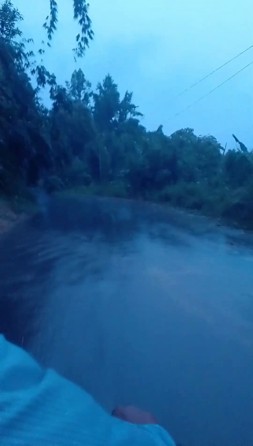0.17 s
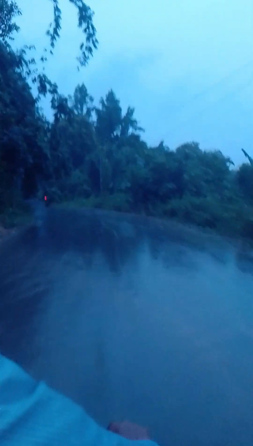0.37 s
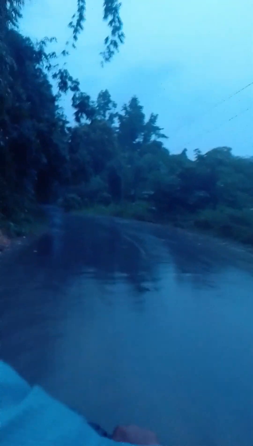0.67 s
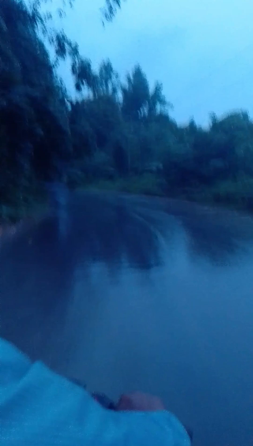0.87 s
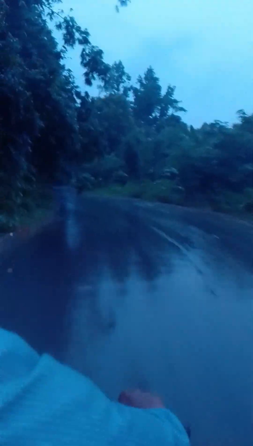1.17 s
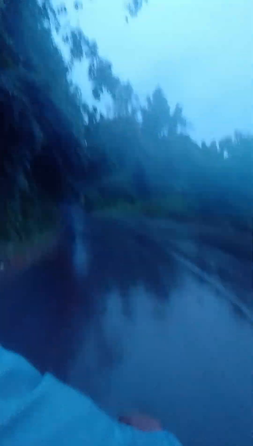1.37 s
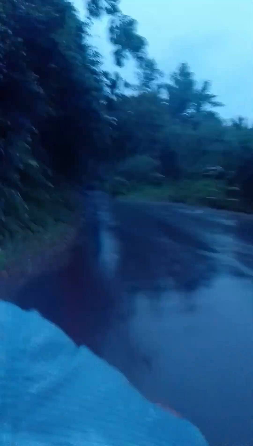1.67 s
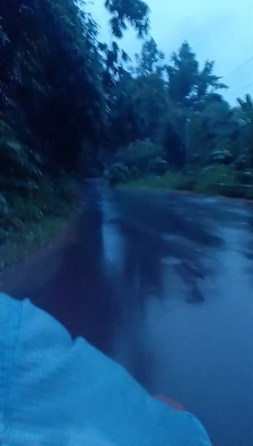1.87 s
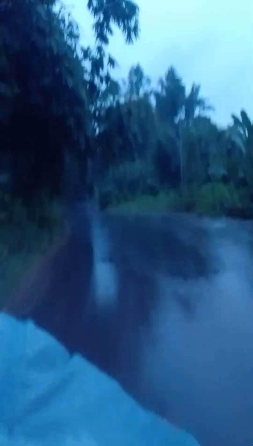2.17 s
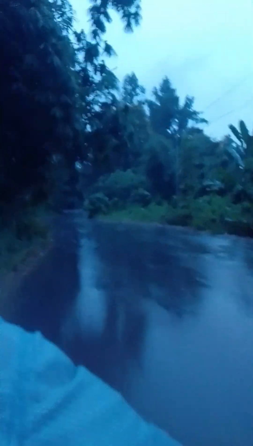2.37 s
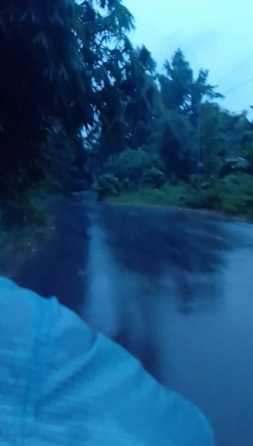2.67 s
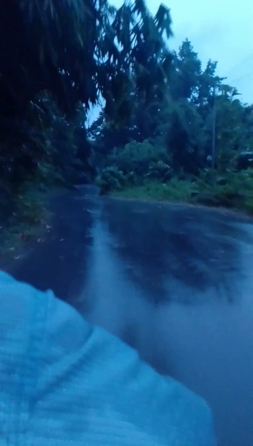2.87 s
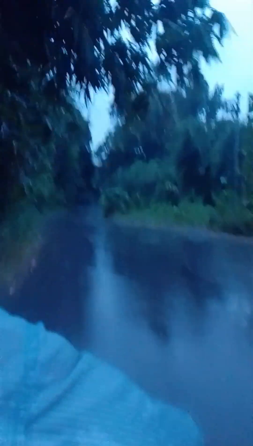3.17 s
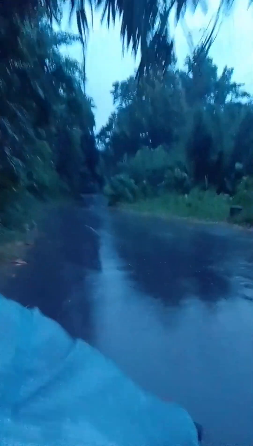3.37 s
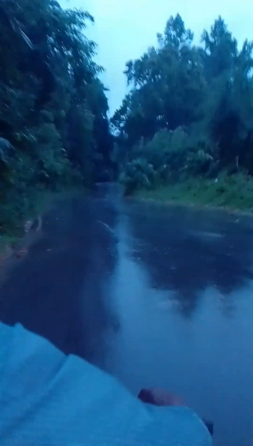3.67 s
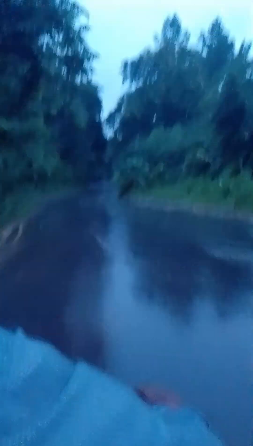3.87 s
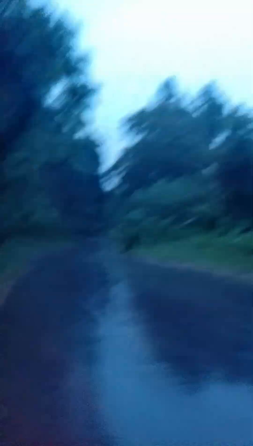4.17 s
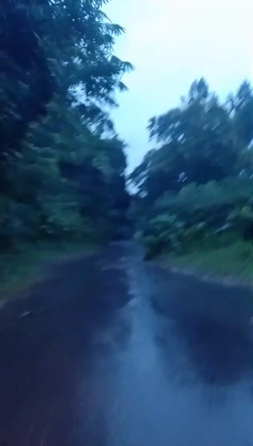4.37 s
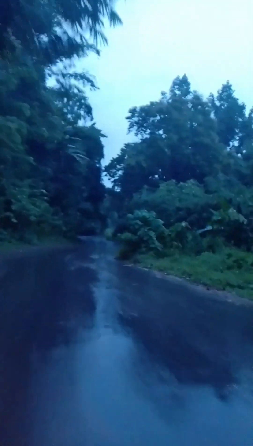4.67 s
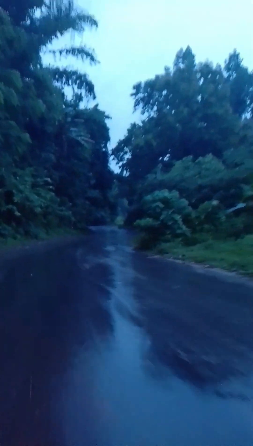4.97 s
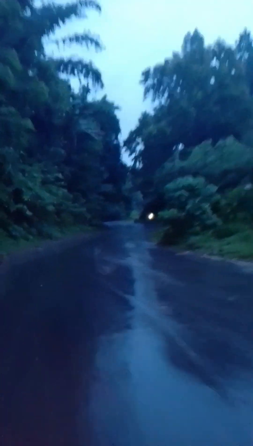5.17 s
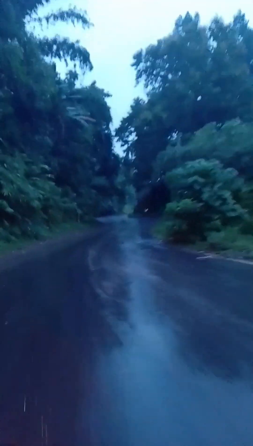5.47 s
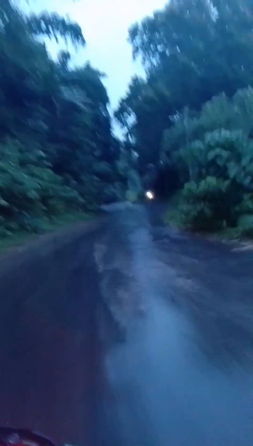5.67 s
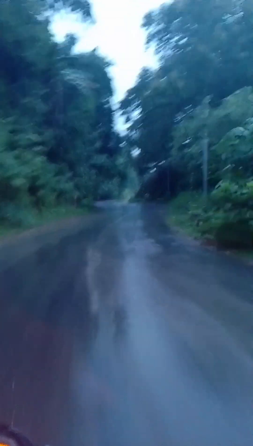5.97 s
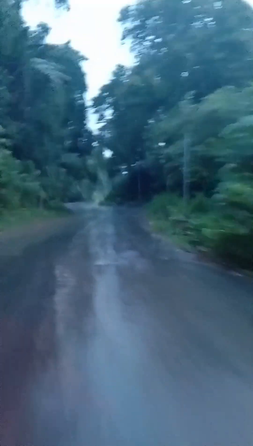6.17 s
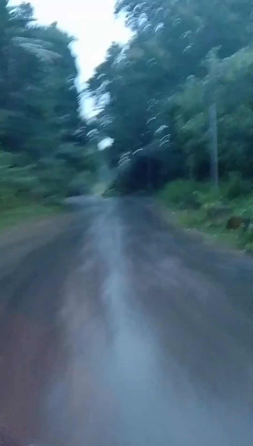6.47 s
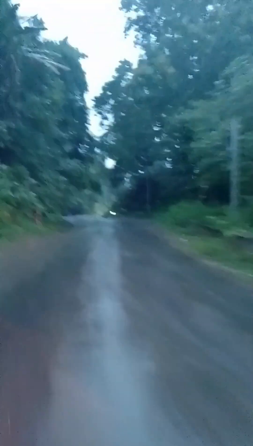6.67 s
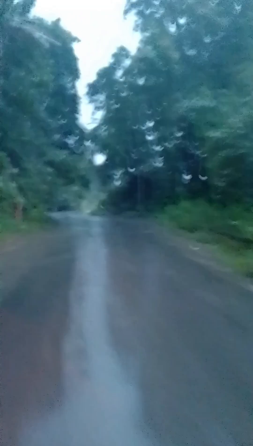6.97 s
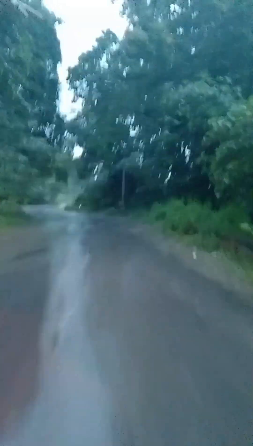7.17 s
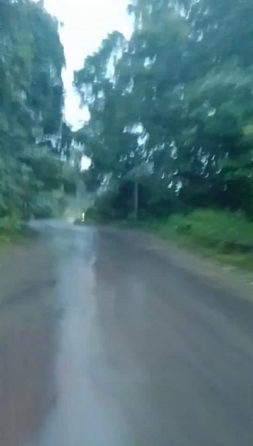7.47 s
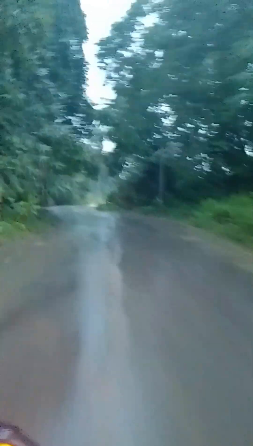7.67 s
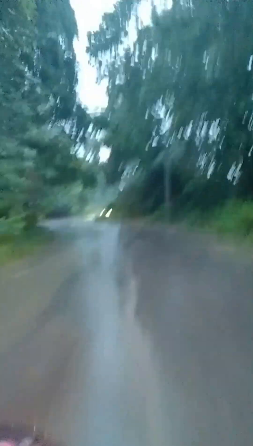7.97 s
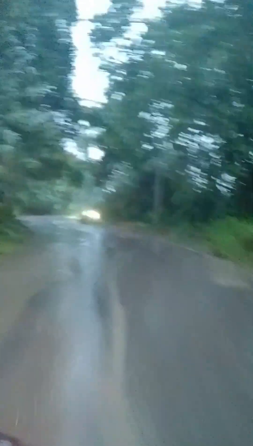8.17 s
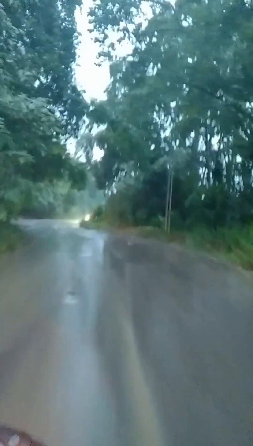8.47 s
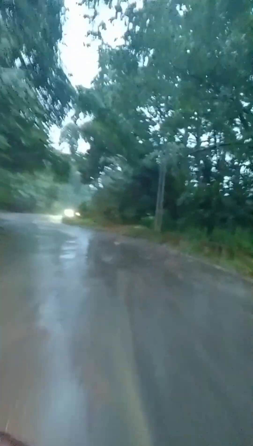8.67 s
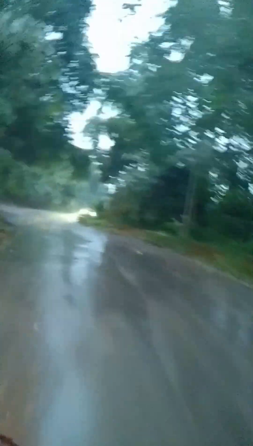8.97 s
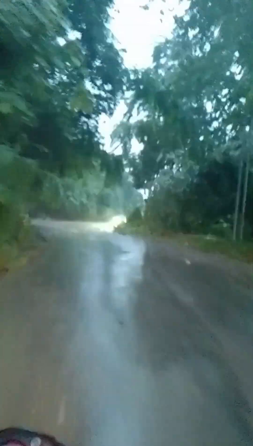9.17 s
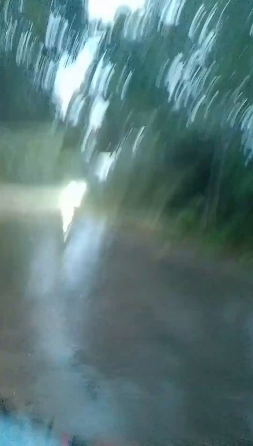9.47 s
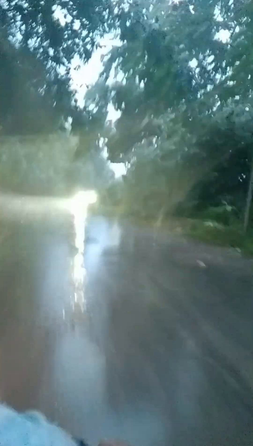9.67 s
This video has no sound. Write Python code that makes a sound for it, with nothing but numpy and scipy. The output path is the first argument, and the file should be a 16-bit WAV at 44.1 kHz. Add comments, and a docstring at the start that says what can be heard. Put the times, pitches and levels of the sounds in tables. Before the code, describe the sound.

Outdoors on a wet road, irregular hard drops tap right at the microphone, the loudest near three and a half seconds. Fine patter and brief fizzy spray fill the gaps. Soft hiss and a low drone lie beneath. Blustery wind thuds build through the middle, with rain heaviest around six seconds, and both subside towards the end.

```python
"""Raindrops tap a hand-held camera and its microphone, on a two-wheeler ridden along a wet road.
Each tap is a filtered knock with a rebound and a fizz of noise; a few dull knocks may be wind kicks instead.
Finer drops patter on camera and raincoat, and short bursts of spray are crowds of tiny splashes.
From about four seconds on, the airstream buffets the microphone: ragged gusts of random pressure kicks.
Behind, filtered noise gives the hiss of wet tyres and far rain and the drone of road and machine.
All of it rings the air in the microphone port."""
import sys
import numpy as np
from scipy import signal
from scipy.fft import rfft, irfft, next_fast_len
from scipy.io import wavfile
from scipy.ndimage import uniform_filter1d, minimum_filter1d

SR = 44100
rng = np.random.default_rng(int(sys.argv[2]) if len(sys.argv) > 2 else 0)


def dump_mix(stems):
    """Bounce the given channels to the path in sys.argv[1] as a 16-bit WAV at rate SR."""
    frames = np.atleast_2d(stems).T  # one column per channel
    limited = np.clip(frames, -1, 1)  # hard clip at full scale
    pcm = np.round(limited * 32767).astype(np.int16)
    wavfile.write(sys.argv[1], SR, pcm)


N = 433483

# All levels are relative: each source adds its own gain, and spectra are scaled to energy 1.

# Wash and drone of the ride over time: time_s, wash_level_db, drone_level_db
RIDE_LEVELS = [(0, -50, -55), (0.55, -51.5, -56), (1.2, -50, -51.5), (2.6, -51.5, -47.5),
               (5.3, -51.5, -45.5), (9.83, -55, -64)]
# Spectrum of the wash of far rain and wet tyres: frequency_hz, density_db (per Hz)
WASH_SPECTRUM = [(250, -6.5), (650, 0.5), (1100, -4.5), (2000, -6.5), (3300, -6.5), (5000, -14.5),
                 (8000, -18.5), (12500, -18.5), (15000, -12)]
# Spectrum of the drone of road and machine, also of the wind rumble: frequency_hz, density_db (per Hz)
DRONE_SPECTRUM = [(20, -40), (40, 0.5), (85, 7), (130, 6), (200, 3.5), (310, 5.5), (450, -18), (900, -51)]

# Strength of the airstream at the microphone: time_s, level_db
DRAUGHT_LEVELS = [(0, -54.5), (0.28, -40.5), (0.5, -58.5), (1.7, -49), (2.3, -53.5), (3.9, -47),
                  (4.5, -31.5), (4.8, -36), (5.4, -35), (5.8, -29), (6.55, -25), (7.46, -23.5), (7.56, -36),
                  (7.85, -28), (8.5, -27.5), (9.3, -38.5), (9.83, -41.5)]
# Gusts that stand out, their length taken midway up the edges: start_s, length_s, level_db
STRONG_GUSTS = [(0.314, 0.047, -34), (1.293, 0.012, -25.5), (2.568, 0.011, -30.5), (2.611, .021, -29),
                (2.9, 0.023, -33.5), (3.006, 0.0074, -25), (3.165, 0.012, -23), (3.22, .017, -33.5),
                (3.387, 0.011, -35), (3.722, 0.013, -29), (3.971, 0.043, -27.5), (4.098, 0.0075, -24),
                (4.169, 0.012, -19.5), (4.279, 0.021, -22.5), (4.334, 0.044, -23), (4.489, 0.066, -29),
                (4.569, 0.072, -25.5), (4.676, 0.049, -18.5), (4.848, 0.028, -18.5), (5.003, .052, -23.5),
                (5.308, 0.012, -24.5), (5.464, 0.033, -25), (5.569, 0.033, -19.5), (5.666, 0.085, -22),
                (5.876, 0.045, -20), (6.535, 0.045, -14.5), (6.777, 0.015, -21.5), (6.921, 0.017, -5.5),
                (7.609, 0.019, -22.5), (7.686, .16, -22), (8.187, 0.024, -29.5), (8.565, 0.052, -28),
                (9.122, 0.032, -24.5), (9.681, 0.019, -30)]
# Spectrum of the buffeting: frequency_hz, density_db (per Hz)
BUFFET_SPECTRUM = [(30, -36.5), (90, -10), (140, -11.5), (230, -1.5), (330, 1), (520, -5), (1150, -18),
                   (1750, -22.5), (2000, -30.5), (2300, -28), (3000, -38.5), (8000, -58), (14000, -52.5)]

# Bursts of spray on the camera: start_s, level_db
SPRAY_BURSTS = [(0.31, -43), (4.08, -37.5), (4.69, -31), (6.34, -35), (6.73, -32), (7.669, -38),
                (8.28, -39), (9.092, -37)]

# How hard the pattering rain arrives: time_s, gain_db
RAIN_STRENGTH = [(0, 0), (0.9, -5.5), (2.0, 2), (2.9, -0.5), (3.5, -15.5), (4.3, -3.5), (5.3, 1),
                 (6.3, 11.5), (8.1, -6.5), (9.83, -4)]
# Loudest single hits: drops on the camera, and a few dull knocks that may be wind kicks:
# start_s, level_db, splash_db (higher for more splash against tap)
LOUD_HITS = [(0.053, -7, -11), (0.133, -11, -7.5), (0.231, -14, -15), (0.334, -9, -2), (0.644, -9, -7),
             (0.659, -6, -25), (0.726, 7, -22), (0.972, -6, -16), (1.192, -15, -7), (1.271, -7, -20),
             (1.66, -5, -20), (1.698, -17.5, -3.5), (2.078, -13, -5), (2.144, -12.5, -10),
             (2.179, -20, -4.5), (3.038, -14.5, -5), (3.115, -9, -14), (3.138, -2.5, -19),
             (3.55, 13, -12.5), (3.771, -16.5, -8.5), (4.157, -13, -2.5), (4.282, -3.5, -16),
             (4.337, -8, -32), (4.634, -6.5, -10), (4.849, -4.5, -17.5), (4.956, -9, -7.5),
             (5.117, -5, -14), (5.165, -10, -11.5), (5.401, -6.5, -8), (5.484, -8.5, -7), (5.903, 4.5, -21),
             (6.025, -1, -20), (6.191, -6.5, -20), (6.667, -0.5, -18), (7.041, -0.5, -13),
             (7.261, -10, -14), (7.272, -1.5, -13.5), (7.57, -5, -6), (7.652, -5, -10.5), (7.688, -5.5, -6),
             (7.989, -9, -31), (8.418, -10, -9.5), (8.511, -16.5, -4.5), (8.683, -8, -6.5),
             (8.876, -8.5, -5.5), (9.406, -17, -9), (9.525, -9, -11)]
# Spectrum of the dull tap of a hit on the casing: frequency_hz, density_db (per Hz)
TAP_SPECTRUM = [(60, -31), (300, -2), (800, -6), (2000, -4.5), (3500, -3.5), (6000, -8.5), (16000, -41)]
# Spectrum of the splash of a drop: frequency_hz, density_db (per Hz)
SPLASH_SPECTRUM = [(1200, -19), (3200, 8), (5000, 5), (8000, -7), (12300, -1), (15000, 1)]

# Resonances of the air in the microphone port: frequency_hz, quality_factor
PORT_MODES = [(1960, 6.8), (15300, 24)]


def amp(db):
    """Decibels to gain."""
    return 10 ** (np.asarray(db) / 20)


def unit(x):
    """Scales to rms 1."""
    return x / np.sqrt(np.mean(x ** 2) + 1e-20)


def curve(rows, axis=1):
    """One column of a time table, at every sample."""
    rows = np.array(rows, float)
    return np.interp(np.arange(N) / SR, rows[:, 0], rows[:, axis])


def add(mix, start_s, sound):
    """Mixes a sound in at start_s."""
    part = mix[..., max(round(start_s * SR), 0):][..., :sound.shape[-1]]
    part += sound[..., :part.shape[-1]]


def response(points, size=2048):
    """Causal, minimum-phase impulse response of energy 1 with the given spectrum."""
    hz, db = np.transpose(points)
    grid_hz = abs(np.fft.fftfreq(size, 1 / SR))
    level_db = np.interp(np.log(grid_hz + 1), np.log(hz), db)
    log_gain = np.log(amp(level_db))
    spectrum = np.exp(np.conj(signal.hilbert(log_gain)))
    taps = np.fft.ifft(spectrum).real[:size // 2]
    return taps / np.linalg.norm(taps)


def colour(x, points):
    """Gives a white drive the spectrum of a table."""
    return signal.oaconvolve(x, response(points))[:len(x)]


def wander(hz):
    """Slow chance of rms 1, moving at up to about hz."""
    f = np.fft.rfftfreq(N, 1 / SR)
    noise = rfft(rng.standard_normal(N))
    return unit(irfft(noise / (1 + (f / hz) ** 4), N))


def road(wash_db=-1, drone_db=0, flicker_db=2.5, lump_db=2):
    """Wet tyres and far rain hiss with a flicker; road and machine drone unevenly below."""
    hiss = rng.standard_normal(N) * amp(flicker_db * wander(90))
    wash = colour(hiss, WASH_SPECTRUM) * amp(wash_db + curve(RIDE_LEVELS, axis=1))
    hum = rng.standard_normal(N) * amp(lump_db * wander(21))
    drone = colour(hum, DRONE_SPECTRUM) * amp(drone_db + curve(RIDE_LEVELS, axis=2))
    return wash + drone


def puffs(draught_db, half_db=-33, span_db=17, puff_hz=23, sharpness=6, slack_db=-14):
    """The airstream catches the microphone and lets go: rare puffs when weak, brief lulls when strong."""
    bias = (draught_db - half_db) / span_db
    caught = 1 / (1 + np.exp(-sharpness * (wander(puff_hz) + bias)))
    share = 1 / (1 + np.exp(-2 * bias))  # of the time that it is caught
    slack = amp(slack_db) ** 2  # power left in the lulls
    return amp(draught_db) * np.sqrt((caught ** 2 + slack) / (share + slack))


def wind(level_db=3.0, eddy_db=4.0, eddy_hz=70, kicks_per_s=2200, edge_s=0.0068, even_s=0.044,
         rumble_db=-27.5, rumble_follow=0.49):
    """Gusts break into eddies, and the eddies into quick pressure kicks; a rumble swells more gently."""
    power = puffs(curve(DRAUGHT_LEVELS)) ** 2
    for start_s, length_s, gust_db in STRONG_GUSTS:
        t = np.arange(0, length_s + 2 * edge_s, 1 / SR)
        ramp = np.clip(np.minimum(t, t[-1] - t) / (2 * edge_s), 0, 1)
        swell = np.sin(np.pi / 2 * ramp) ** 2
        add(power, start_s - edge_s, (amp(gust_db) * swell) ** 2)
    strength = np.sqrt(power)

    eddies = amp(eddy_db * wander(eddy_hz))
    eddies /= np.sqrt(uniform_filter1d(eddies ** 2, int(even_s * SR)))  # they share out the gust's energy
    kicks = unit(rng.standard_normal(N) * (rng.random(N) < kicks_per_s / SR))
    buffet = colour(strength * eddies * kicks, BUFFET_SPECTRUM)
    rumble = colour(strength ** rumble_follow * rng.standard_normal(N), DRONE_SPECTRUM)
    return amp(level_db) * buffet + amp(rumble_db) * rumble


def spray(level_db=0, length_s=0.057, droplets_per_s=900, spread_db=4, width=0.7):
    """A burst of spray swells and fades as a crowd of tiny splashes; its fizz spreads wide."""
    swell = np.zeros(N)
    for start_s, burst_db in SPRAY_BURSTS:
        add(swell, start_s, amp(level_db + burst_db) * np.hanning(int(length_s * SR)))
    sizes = rng.standard_normal(N) * amp(spread_db * rng.standard_normal(N))
    droplets = unit(sizes * (rng.random(N) < droplets_per_s / SR))
    side = unit(np.gradient(colour(rng.standard_normal(N), SPLASH_SPECTRUM)))
    return swell * (colour(droplets, SPLASH_SPECTRUM) + width * np.array([side, -side]))


def hit(splash_db, apart, tap, splash, rebound=0.93, rebound_s=0.000466, splash_s=0.0012,
        lift_db=16, size=900):
    """A drop presses on the casing and rebounds; its splash, faint in a dull knock, is a brief fizz."""
    t = np.arange(size) / SR
    delay, bounce = rng.random(2)
    late_tap = np.interp(t - rebound_s * (.5 + delay), t, tap[:size], left=0)
    knock = tap[:size] - rebound * bounce * late_tap
    bursts = rng.standard_normal((2, size)) * np.exp(-t / splash_s)
    both, side = (unit(signal.fftconvolve(burst, splash)[:size]) for burst in bursts)
    side = unit(np.gradient(side))  # mostly the finest fizz differs between the channels
    fizz = both + apart * np.array([side, -side])
    return knock + amp(splash_db + lift_db) * knock.std() * fizz


def patter(per_s, level_db, spread_db, splash_db, clump_db, clump_hz=9, most=1.67, count=24):
    """Drops arrive at random in little flurries, many small and few large."""
    out, tap, splash = np.zeros((2, N)), response(TAP_SPECTRUM), response(SPLASH_SPECTRUM)
    shapes = [hit(splash_db + 4 * rng.standard_normal(), 0, tap, splash) for _ in range(count)]
    strength, flurry = amp(curve(RAIN_STRENGTH)), amp(clump_db * wander(clump_hz))
    chance, sizes, kinds = rng.random(N), rng.exponential(1, N), rng.integers(0, count, N)
    for i in np.flatnonzero(chance < per_s * flurry / flurry.mean() / SR):
        gain = strength[i] * amp(level_db + spread_db * min(sizes[i], most))
        add(out, i / SR, gain * shapes[kinds[i]])
    return out


def loud_hits(level_db=1, width=0.2):
    """Drops on the camera and a few dull knocks that may be wind kicks; more splash sounds wider."""
    out, tap, splash = np.zeros((2, N)), response(TAP_SPECTRUM), response(SPLASH_SPECTRUM)
    for start_s, hit_db, splash_db in LOUD_HITS:
        apart = width * amp(splash_db) ** 2
        add(out, start_s, amp(level_db + hit_db) * hit(splash_db, apart, tap, splash))
    return out


def scene():
    """Wind and road in the middle; hits and spray on the camera, duller drops on the coat."""
    on_camera = patter(per_s=45, level_db=-42.5, spread_db=10, splash_db=-1.5, clump_db=4.5)
    on_coat = patter(per_s=150, level_db=-56.5, spread_db=5.0, splash_db=-32, clump_db=7.5)
    return wind() + road() + loud_hits() + spray() + on_camera + on_coat


def record(dry, notch_hz=165.2, notch_q=2.14, ceiling_db=-2.5, recover_db_per_s=120, edge_hz=16200):
    """Everything rings the microphone port; then a low notch, a quick peak limiter and the band limit."""
    padded = next_fast_len(N + SR)
    hz = np.fft.rfftfreq(padded, 1 / SR)
    port = np.ones(len(hz), complex)
    for mode_hz, q in PORT_MODES:
        port /= 1 - (hz / mode_hz) ** 2 + 1j * hz / (mode_hz * q)
    x = irfft(rfft(dry, padded) * port, padded)[:, :N]
    # the microphone is deaf in a low band
    x = signal.lfilter(*signal.iirnotch(notch_hz, notch_q, SR), x)

    # the limiter turns both channels down together, then recovers at a steady rate
    over_db = np.maximum(20 * np.log10(abs(x).max(0) + 1e-9) - ceiling_db, 0)
    fall_db = np.arange(N) / SR * recover_db_per_s
    duck_db = fall_db - np.maximum.accumulate(over_db + fall_db)
    smooth_db = uniform_filter1d(minimum_filter1d(duck_db, size=89), size=89)
    x = x * amp(smooth_db)

    low_pass = signal.firwin(255, edge_hz, window=("kaiser", 9), fs=SR)
    return signal.oaconvolve(x, low_pass[None], "same")


dry = scene()
out = record(dry)
dump_mix(out)
```